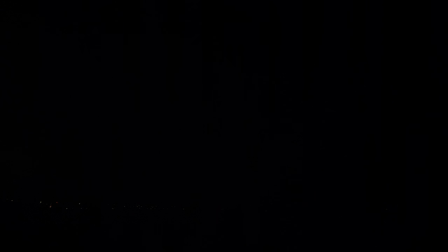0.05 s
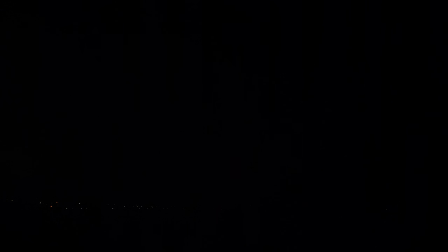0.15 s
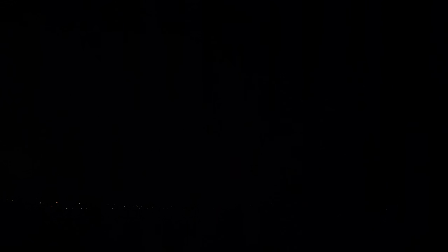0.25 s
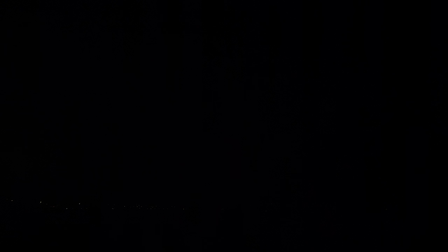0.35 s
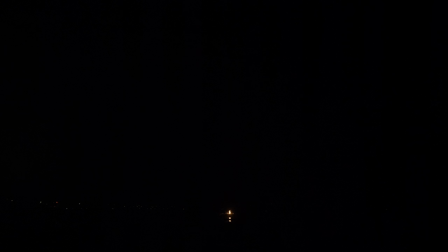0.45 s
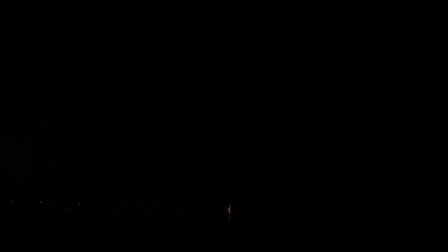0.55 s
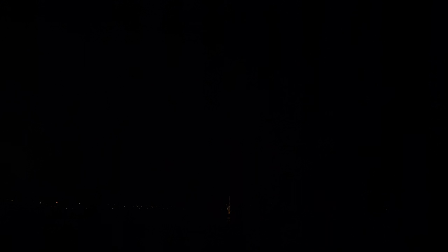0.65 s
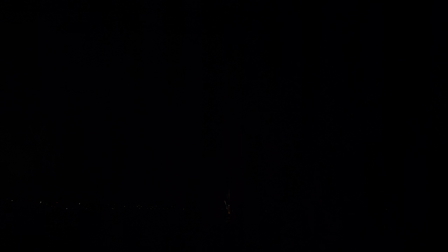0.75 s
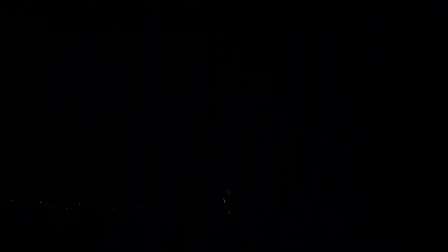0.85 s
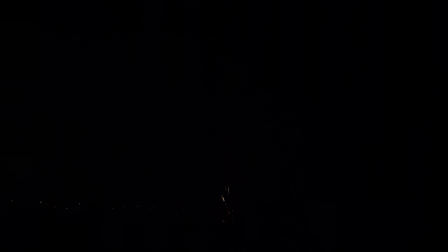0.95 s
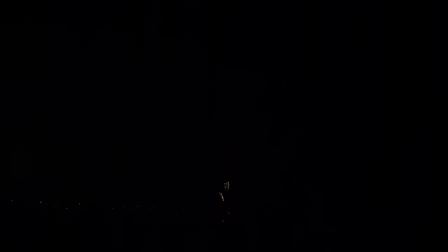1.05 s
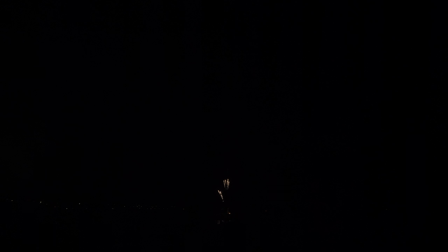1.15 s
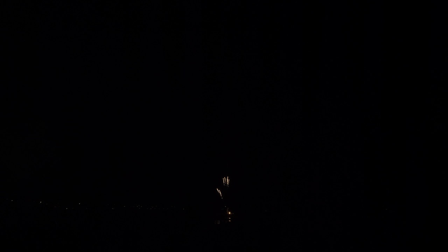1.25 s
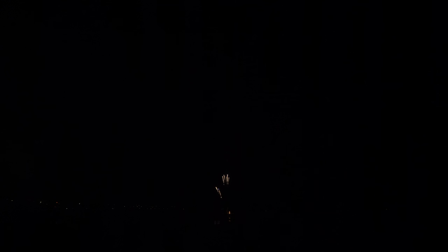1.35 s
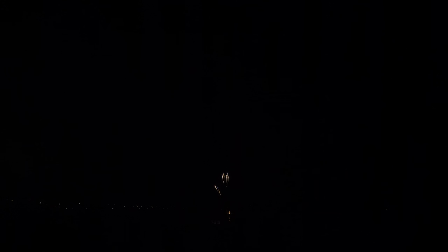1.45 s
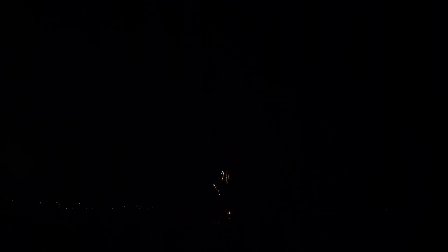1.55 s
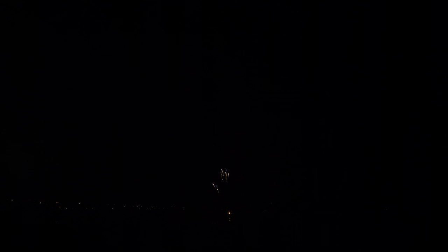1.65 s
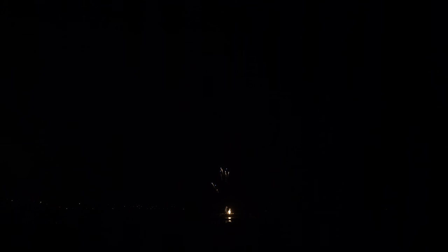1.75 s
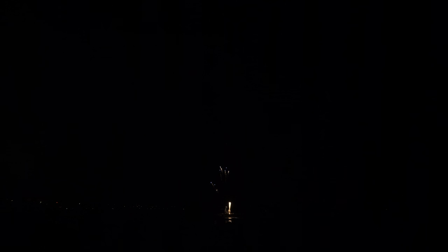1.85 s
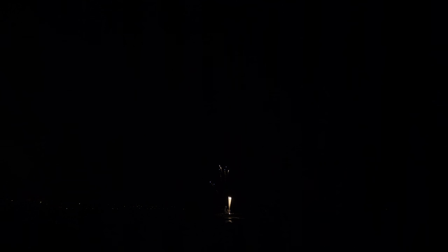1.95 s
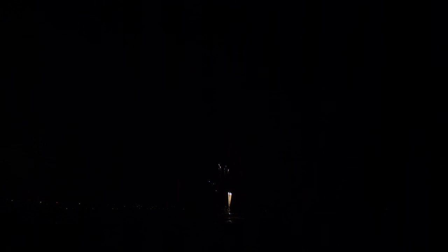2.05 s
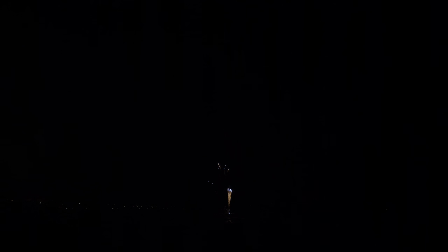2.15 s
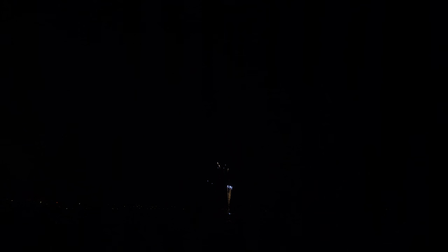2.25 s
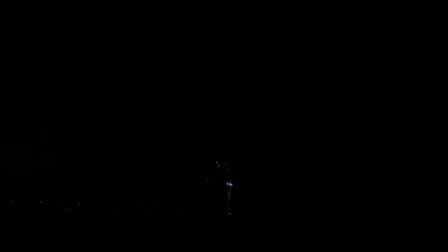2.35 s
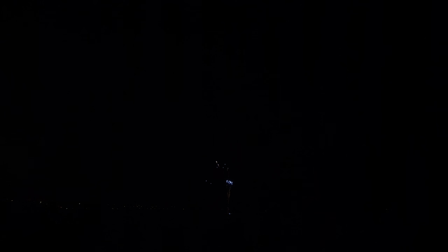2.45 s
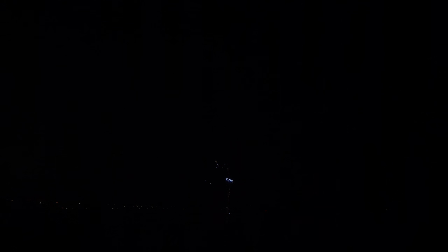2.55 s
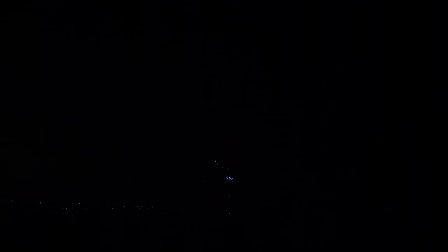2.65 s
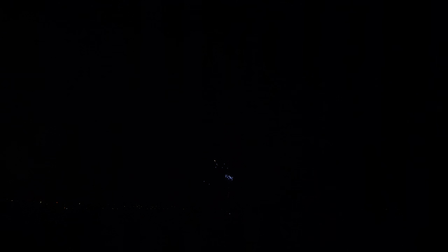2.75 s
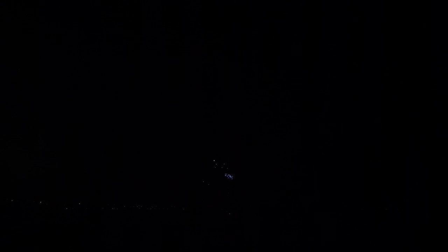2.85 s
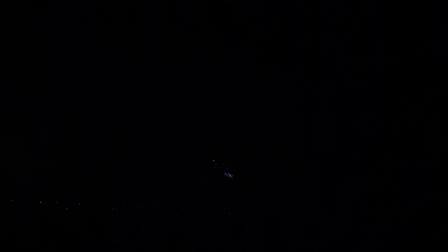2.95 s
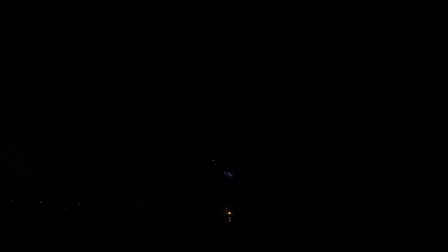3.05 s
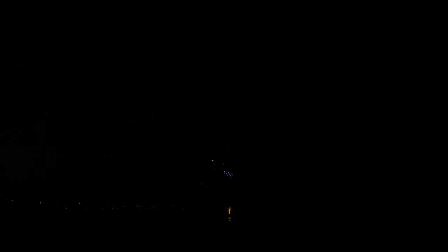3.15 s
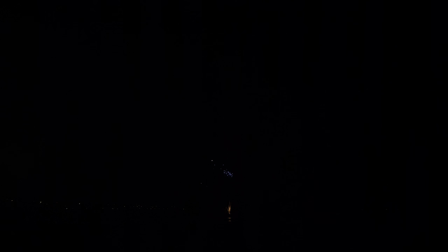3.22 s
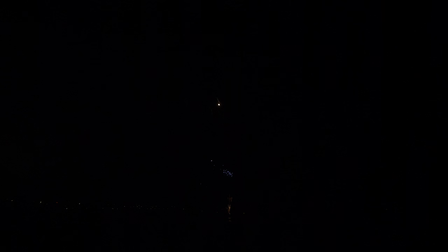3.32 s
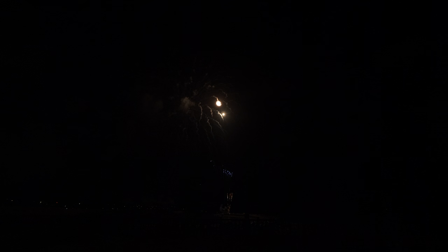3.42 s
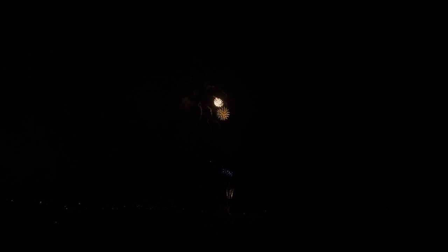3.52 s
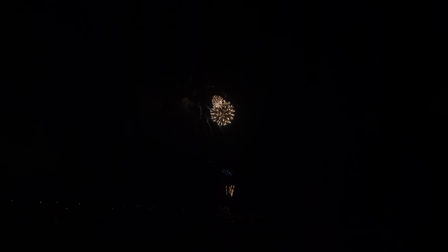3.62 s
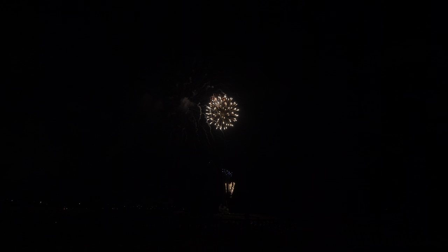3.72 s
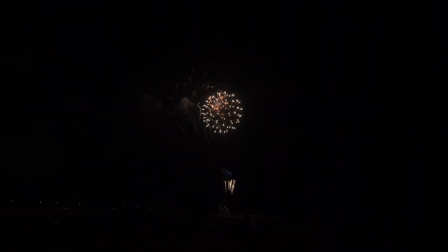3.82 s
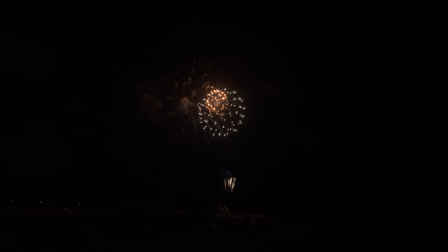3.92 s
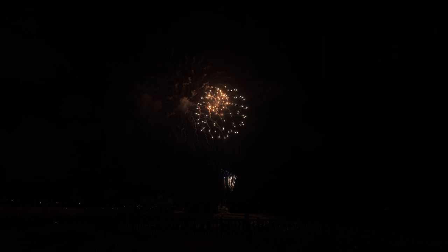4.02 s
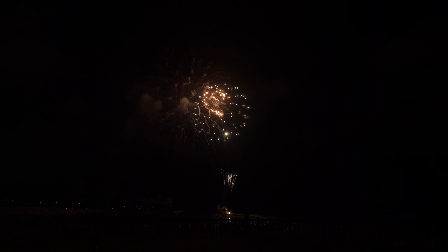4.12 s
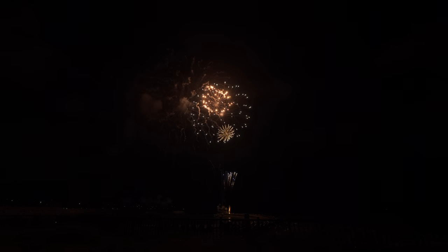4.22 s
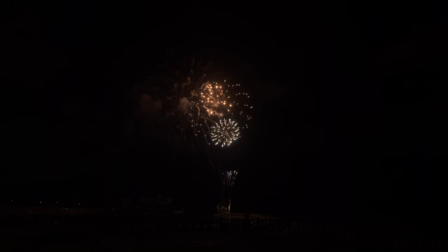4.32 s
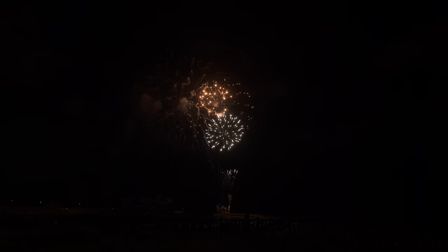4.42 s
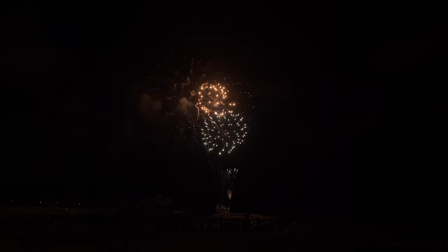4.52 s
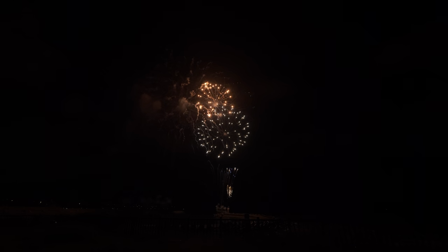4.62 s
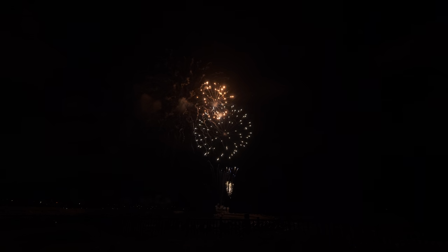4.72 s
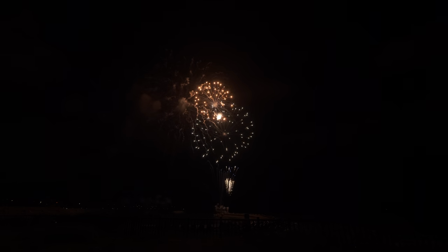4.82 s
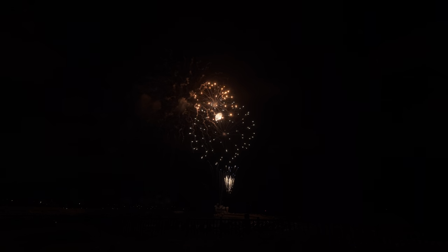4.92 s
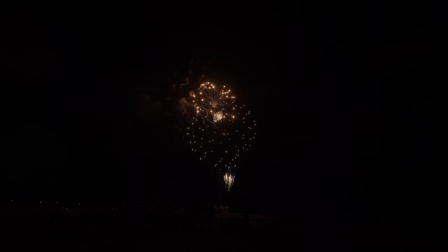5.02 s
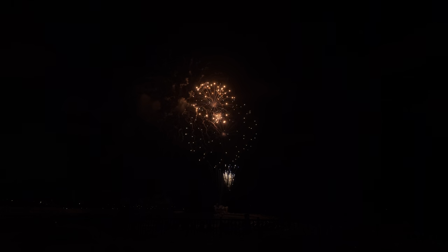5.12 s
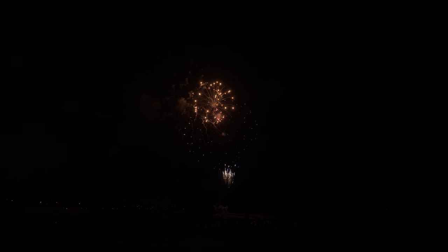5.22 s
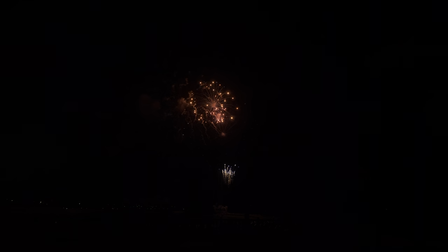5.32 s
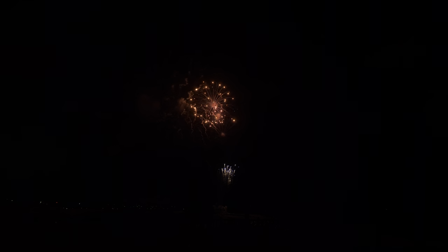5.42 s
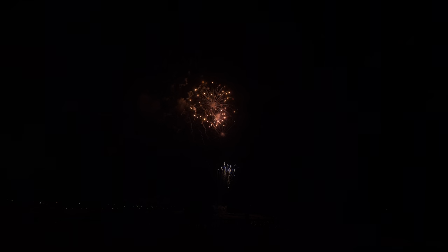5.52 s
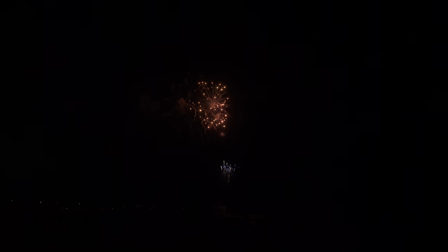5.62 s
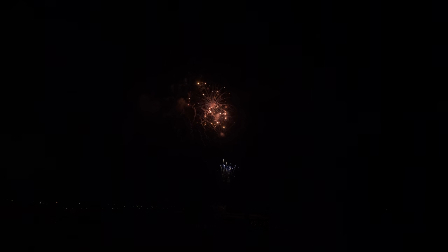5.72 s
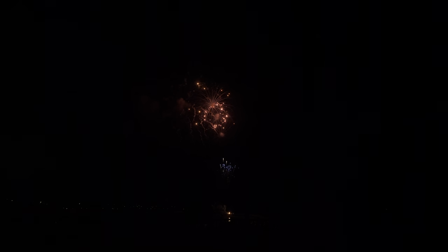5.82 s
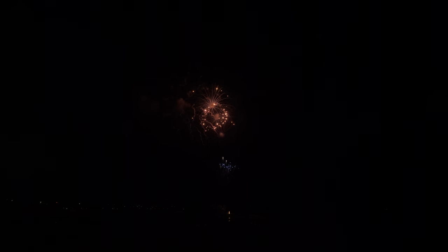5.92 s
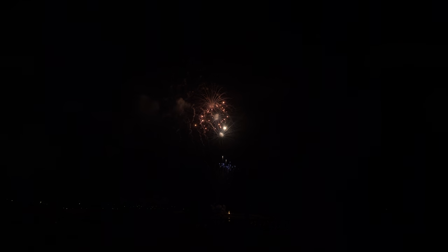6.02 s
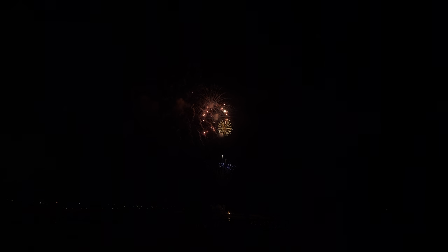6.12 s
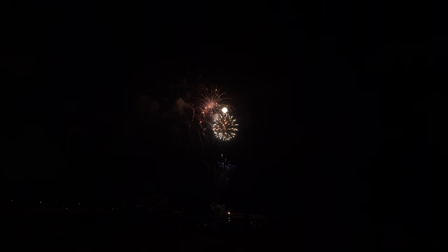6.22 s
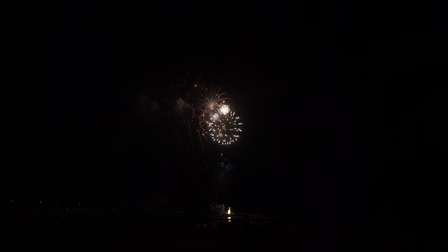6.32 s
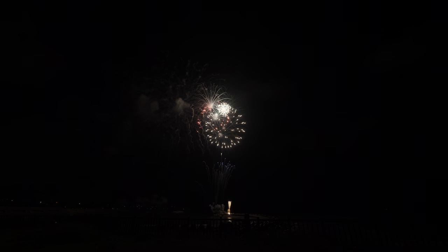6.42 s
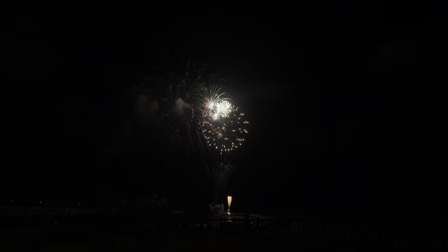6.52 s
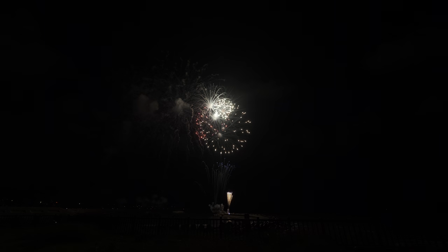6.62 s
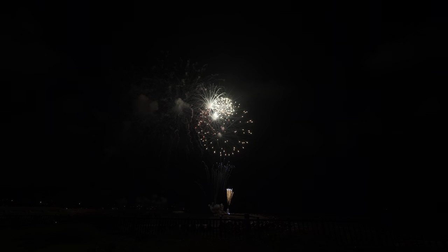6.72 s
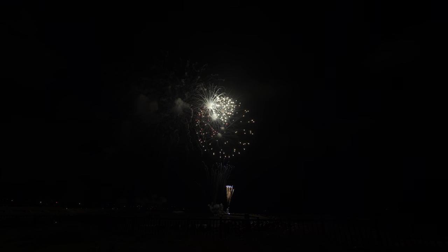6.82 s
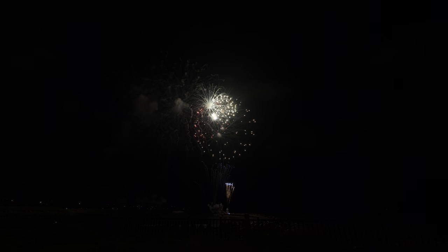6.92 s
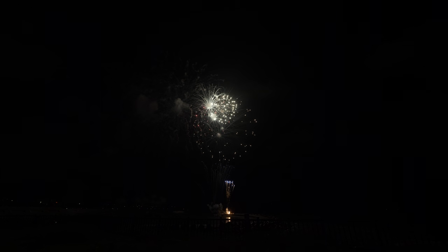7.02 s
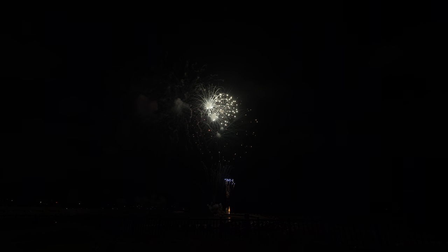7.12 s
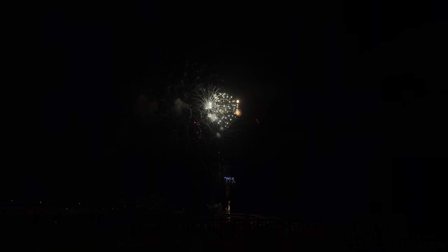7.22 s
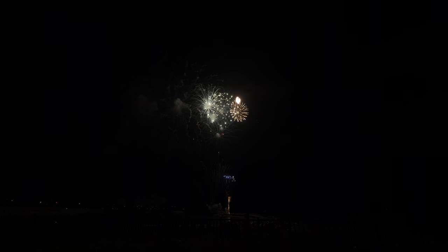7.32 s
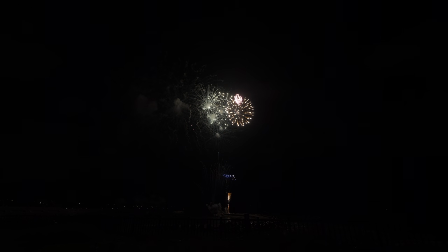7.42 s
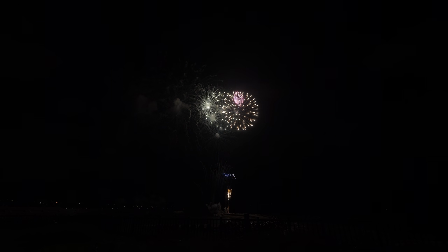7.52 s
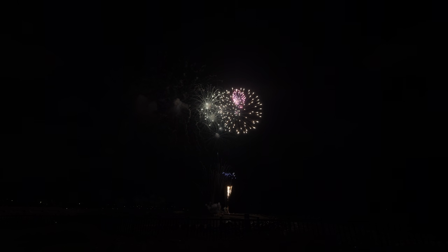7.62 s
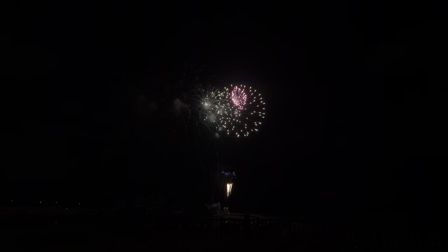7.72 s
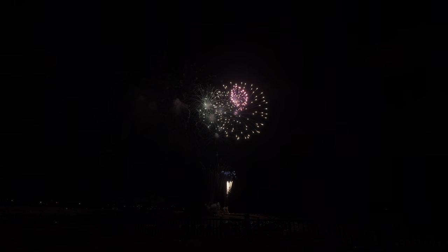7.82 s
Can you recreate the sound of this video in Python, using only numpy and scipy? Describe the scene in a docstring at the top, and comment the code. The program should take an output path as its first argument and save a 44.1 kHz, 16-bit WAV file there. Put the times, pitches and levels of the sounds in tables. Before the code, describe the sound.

On a dark shore, soft surf, chirping crickets and a thin bush-cricket buzz are broken by deep mortar thumps. Then aerial shells burst over the sea with hard, overloading cracks, dull distant thuds and a rumbling, crackling roll of echoes. A last sharp pair of bangs and another launch thump end it. The stereo microphones also catch tiny close ticks and slight hiss.

```python
"""Night fireworks over the sea, heard from the shore by a spaced microphone pair that overloads.
From the start surf washes, crickets chirp, a bush cricket buzzes and small ticks sound close by.
From 1.1 s mortars thump: a rounded blast, then a decaying low boom; dull far echoes follow.
From 4.1 to 6.9 s shells burst, each a shock with its ground echo and a scatter of clicks; a last mortar
fires at 7.7 s. Every bang sets off a roll of coast echoes, built from clumps of filtered random clicks."""
import sys
import numpy as np
from scipy import signal
from scipy.fft import rfft, irfft
from scipy.io import wavfile

SR = 44100
rng = np.random.default_rng(int(sys.argv[2]) if len(sys.argv) > 2 else 0)


def waveform_to_disk(signal):
    """Save audio, clipped to [-1, 1], as 16-bit WAV at the path in sys.argv[1]."""
    frames = np.transpose(np.atleast_2d(signal))
    scaled = np.clip(frames, -1, 1) * 32767
    samples = np.round(scaled).astype(np.int16)
    wavfile.write(sys.argv[1], SR, samples)


N = 346626

# shell bursts: [t/s, shock level/dB, overpressure/ms, ground echo delay/ms, ground echo level/dB, roll level/dB]
SHELL_BURSTS = [(4.0710, 9, 1.18, 4.52, 0, -29.5), (4.1950, 14, 1.85, 4.18, 1, -25),
                (4.875, 14, 1.7, 3.4, -5.5, -25), (5.4959, 4.5, 0.87, 4.06, -5, -34),
                (6.8088, 13.5, 1.74, 3.64, 0.5, -28), (6.8936, 3.5, 1.08, 4.36, -5, -27.5)]
# echoes from nearby walls and slopes: [delay/ms, level/dB]
WALL_ECHOES = [(12.2, -11), (15.5, -17), (21.3, -28), (25.2, -21), (29.5, -19.5), (35.5, -19), (48.5, -29),
               (66.5, -25.5), (97.5, -31), (103.5, -31.5)]
# rough front of a burst: [f/Hz, level/dB per Hz]
BURST_FRONT = [(200, -43), (500, -0.5), (1200, 1), (2500, -9.5), (5000, -13.5), (9000, -22.5),
               (14000, -26.5), (20000, -76)]


def bursts():
    """Shell bursts: shock, ground echo, dull near echoes and a short bright scatter."""
    out = np.zeros((2, N))
    for s, db, ms, ground_ms, ground_db, _ in SHELL_BURSTS:
        wave = gain_of(db) * shock(ms, damping=0.54)
        add(out, s, soft(wave, 0.032))
        add(out, s + ground_ms / 1e3, gain_of(ground_db) * soft(wave, 0.069))
        dull = soft(wave, 0.54)
        for late_ms, echo_db in WALL_ECHOES:
            add(out, s + late_ms / 1e3, gain_of(echo_db) * dull)
        add(out, s, crack(BURST_FRONT, 0.83 * db - 22.5, fast_t60=0.032, slow_db=-22.5, slow_t60=0.39))
    return out


# mortar shots: [t/s, blast level/dB, overpressure/ms, rise/ms, boom level/dB, rough front level/dB,
# boom pitch factor, fade-in noise level/dB, roll level/dB]
MORTAR_SHOTS = [(1.1087, 2, 2.07, 0.25, -5.5, -22, 1.1, -44, -38.5),
                (1.1120, -1, 1.27, 0.57, -43, -49, 0.85, -60, -50),
                (2.3854, 3.5, 3.9, 0.45, -7.5, -19.5, 1.09, -42, -39),
                (3.7426, 0.4, 3.3, 0.34, -7.5, -25.5, 0.99, -32.5, -36.5),
                (4.8096, 1.5, 3.3, 0.33, -6.5, -28.5, .99, -42, -28),
                (6.9339, -7, 1.3, 0.47, -13.5, -35, 1.01, -56, -46),
                (7.7006, 2, 3.4, 0.95, -9, -33, 1.09, -37, -38)]
# boom along the water: [f/Hz before the pitch factor, level/dB re boom level, t60/s]
BOOM_MODES = [(38.5, -4.5, 0.28), (65.3, 3, 0.049), (138.8, -12, 0.21)]
# rough front of a mortar: [f/Hz, level/dB per Hz]
MORTAR_FRONT = [(200, -23), (500, -2.5), (1000, 2.5), (2000, -17.5), (2800, -5), (4200, -7.5),
                (6000, -16.5), (9000, -16.5), (13000, -45), (20000, -44)]
# beach and barge answering a mortar: [f/Hz, level/dB per Hz]
BEACH_AND_BARGE = [(60, -28), (150, 4), (300, -4.5), (600, -18), (1000, -23.5), (1800, -34.5), (5000, -59)]


def mortars():
    """A rounded blast with a rough front, and a long suction that rings on as a boom."""
    out = np.zeros((2, N))
    t = np.arange(SR // 2) / SR
    fade_n = 500
    fade_in = np.hanning(2 * fade_n)[:fade_n]
    for s, db, ms, rise_ms, boom_db, crack_db, pitch, fade_db, _ in MORTAR_SHOTS:
        u = t * 1e3 / ms
        pulse = np.cos(np.pi / 2 * u) * np.exp(-(u / 1.4) ** 2)
        blast = gain_of(db) * soft(pulse, rise_ms / 2)
        boom = np.zeros(len(t))
        for hz, mode_db, t60 in BOOM_MODES:
            # negative: starts as suction
            boom -= gain_of(boom_db + mode_db - 60 * t / t60) * np.sin(2 * np.pi * hz * pitch * t)
        thump = blast + boom
        add(out, s, thump)
        add(out, s + 0.085, -gain_of(-13.0) * soft(thump, 1.34))  # a far bank returns it inverted
        add(out, s - 0.0008, crack(MORTAR_FRONT, crack_db, fast_t60=0.025, slow_db=-26.5, slow_t60=0.28))
        answer = crack(BEACH_AND_BARGE, boom_db - 18.5, fast_t60=0.13, slow_db=-16.5, slow_t60=0.52)
        add(out, s + 0.00409, answer)
        # a faint push and noise fade in over about 11 ms before the blast
        noise = crack(MORTAR_FRONT, fade_db, fast_t60=0.56, slow_db=-40, slow_t60=0.5)[:, :fade_n]
        add(out, s - fade_n / SR, fade_in * (gain_of(boom_db - 23.5) + noise))
    return out


# single far echoes: [t/s, peak level/dB before rounding, overpressure/ms, rough front level/dB]
FAR_THUDS = [(1.871, -22, 2.2, -62), (4.287, -10.5, 1.2, -48), (4.714, -10, 1.5, -35.5),
             (5.043, -15.5, 1.07, -35), (5.11, -23, 2.2, -32), (5.244, -13.5, 1.9, -33.5),
             (5.299, -11.5, 1.13, -46), (5.401, -11, 1.8, -36.5), (5.527, -31, 1, -31),
             (5.663, -9, 1.26, -37), (5.726, -34, 1.8, -42), (5.969, -21.5, 0.95, -51),
             (6.008, -22.5, 1.54, -43.5), (6.143, -24, 1.7, -49), (6.356, -6, 1.4, -34),
             (7.3, -18, 1.9, -52), (7.331, -9.5, 1.9, -38.5), (7.479, -25, 1.6, -38.5),
             (7.594, -20, 1.57, -46)]
# rough front of a far echo: [f/Hz, level/dB per Hz]
FAR_FRONT = [(250, -17), (500, 9), (1200, -6.5), (2500, -15.5), (5000, -26), (9000, -45), (20000, -78)]
THUD_ROUNDING = 0.36  # share of the overpressure time
THUD_REPEAT_S, THUD_REPEAT_DB = 0.02305, -6.5  # a slope repeats each thud


def thuds():
    """Far echoes have lost their edge in the air; a little of the rough front is left."""
    out = np.zeros((2, N))
    for s, db, ms, crack_db in FAR_THUDS:
        thud = gain_of(db) * soft(shock(ms, damping=0.3), THUD_ROUNDING * ms)
        add(out, s, thud)
        add(out, s + THUD_REPEAT_S, gain_of(THUD_REPEAT_DB) * soft(thud, 0.4))
        add(out, s, crack(FAR_FRONT, crack_db, fast_t60=0.067, slow_db=-47, slow_t60=0.46))
    return out


# spectra of the three roll bands, low to high: [f/Hz, level/dB per Hz]
RUMBLE_SPECTRUM = [(12, -32), (20, -8), (48, 4), (161, 3), (226, -1.5), (328, -8.5), (386, -17), (520, -40),
                   (700, -30.5), (910, -57), (1540, -120)]
RATTLE_SPECTRUM = [(260, -23.5), (450, 2), (527, -1), (663, -5), (717, -5), (1190, -7.5), (2500, -22.5),
                   (3250, -39), (5500, -120)]
SIZZLE_SPECTRUM = [(1350, -26), (2300, -3), (2870, -4), (3320, -1), (5970, -9.5), (7760, -16), (12000, -23),
                   (15600, -43), (22000, -120)]
# roll envelopes, rows rumble, rattle, sizzle: [delay/s, swell/s, decay/dB per s, level/dB re roll level]
BURST_ROLL_SHAPE = [(0.029, .06, 15.5, 1.3), (0.058, 0.049, 14, -14), (0.035, .04, 17, -26.5)]
MORTAR_ROLL_SHAPE = [(0.024, 0.056, 19.6, -1.5), (0.025, 0.049, 29, -18.5), (0.029, 0.033, 31.4, -28)]
THUD_ROLL_DB = -29  # re thud peak
# steady sea: [f/Hz, level/dB per Hz]
SEA_SPECTRUM = [(12, -45), (20, 5.5), (82, 0.5), (103, -4), (134, -3.5), (192, -15.5), (487, -19),
                (538, -27), (744, -25.5), (1050, -24.5), (2210, -32), (2500, -40), (3250, -60),
                (5500, -120)]
SEA_DB = -49.5
# surf rising and falling on the beach: [t/s, level/dB]
SURF_LEVEL = [(0.0, -64), (0.76, -60.5), (1.3, -57.5), (1.8, -59), (2.3, -73), (3.1, -68.5), (3.7, -74),
              (5.0, -67), (6.5, -56.5), (7.86, -64)]
SURF_LOW_DB, FIZZ_DB, FIZZ_FOLLOWS = -57, -69, 0.17  # steady low wash; mean fizz; its share of the surf's dB swing
ROLL_STEP = 64  # samples per envelope point


def roll():
    """Bangs set off countless small echoes in clumps, sparse in the bass, dense above; the sea washes under."""
    shells = [(row[0], row[-1]) for row in SHELL_BURSTS]
    low = [(row[0], row[-1]) for row in MORTAR_SHOTS]
    low += [(row[0], row[1] + THUD_ROLL_DB) for row in FAR_THUDS]
    t = np.arange(0, N + ROLL_STEP, ROLL_STEP) / SR
    surf_db = np.interp(t, *np.transpose(SURF_LEVEL))
    fizz_db = FIZZ_DB + FIZZ_FOLLOWS * (surf_db - surf_db.mean())
    under_db = (SURF_LOW_DB, surf_db, fizz_db)
    seeds = rng.exponential(1, N) ** 3 * (rng.random(N) < 110 / SR)
    clumps = evened(soft(seeds, 3.5) ** 0.35).clip(-2, 2)
    out = gain_of(SEA_DB) * evened(coloured(scattered(9000, 1.0), SEA_SPECTRUM))
    spectra = (RUMBLE_SPECTRUM, RATTLE_SPECTRUM, SIZZLE_SPECTRUM)
    clicks_per_s, clump_db = (500, 5000, 12000), (2.2, 2.9, 2.3)
    for k, points in enumerate(spectra):
        clicks = coloured(scattered(clicks_per_s[k], 1.9), points)
        echoes = evened(clicks * gain_of(clump_db[k] * clumps))
        power = rolling(shells, *BURST_ROLL_SHAPE[k]) + rolling(low, *MORTAR_ROLL_SHAPE[k])
        power = power + gain_of(under_db[k]) ** 2
        out += echoes * np.interp(np.arange(N) / SR, t, np.sqrt(power))
    return out


def rolling(starts, late, swell, dies_db, over_db):
    """Summed power of the rolls set off by bangs [t/s, level/dB]: each swells, then decays steadily in dB."""
    s, db = np.transpose(starts)[:, :, None]
    u = np.maximum(np.arange(0, N + ROLL_STEP, ROLL_STEP) / SR - s - late, 0)
    level = (1 - np.exp(-u / swell)) * gain_of(db + over_db - dies_db * u)
    return (level ** 2).sum(0)


# small ticks close by: [t/s, level/dB, ring f/Hz, knock level/dB]
CLOSE_TICKS = [(0.3596, -57, 4250, -65), (0.4454, -51.5, 4600, -63), (0.4913, -57, 5300, -64),
               (0.5524, -63, 10700, -56), (2.9094, -66, 7920, -64), (3.1494, -64, 7910, -56),
               (3.2694, -63, 7840, -62), (3.3608, -58, 5650, -71), (3.4196, -59, 5850, -54),
               (4.358, -53, 5940, -62), (5.203, -52.5, 6500, -63), (5.332, -52, 10600, -64),
               (5.719, -50.5, 10200, -62), (5.7494, -57, 10600, -62), (5.7994, -57, 5010, -58),
               (5.8386, -54, 6140, -65), (6.2223, -56.5, 4950, -71), (6.2444, -57.5, 5560, -70),
               (6.272, -56, 10600, -70), (6.542, -48.5, 9870, -76), (6.5999, -58, 5050, -68),
               (6.6314, -52, 5560, -69), (6.6817, -53.5, 9770, -66), (7.4654, -51, 7300, -68)]
CENTRED_DB, PAN_PER_DB = -69, -0.5  # the louder a tick, the nearer it is to the right microphone
TICK_OVERTONE, TICK_OVERTONE_DB = 1.22, -9  # frequency ratio and level re ring
SNAP_SPAN = 2  # snap band: this factor either side of the ring


def ticks():
    """A tiny crack of noise, a brief rough ring with an overtone and a duller knock."""
    out = np.zeros((2, N))
    t = np.arange(1200) / SR
    for s, db, hz, knock_db in CLOSE_TICKS:
        pan_db = PAN_PER_DB * (db - CENTRED_DB)
        noise, waver = rng.standard_normal((2, len(t)))
        band_hz = [hz / SNAP_SPAN, min(hz * SNAP_SPAN, SR / 2.2)]
        b, a = signal.butter(2, band_hz, "bandpass", fs=SR)
        snap = signal.lfilter(b, a, noise) * gain_of(-60 * t / 0.025)
        phase = 2 * np.pi * hz * t + 0.13 * np.cumsum(waver)
        ring = np.sin(phase) + gain_of(TICK_OVERTONE_DB) * np.sin(TICK_OVERTONE * phase)
        ring = ring * gain_of(-60 * t / 0.035)
        knock = gain_of(knock_db - 60 * t / 0.04) * np.sin(2 * np.pi * 2200 * t)
        tick = gain_of(db) * (0.95 * snap + 0.73 * ring) + knock
        add(out, s, gain_of([[pan_db / 2], [-pan_db / 2]]) * tick)
    return out


# cricket runs of falling whistles: [first t/s, last t/s, spacing/s, mean level/dB, mean start f/Hz, length/s]
CRICKET_RUNS = [(.305, .77, .0764, -66, 4120, .054), (.848, 1.03, .087, -65.5, 4200, .042),
                (.83, 1.07, .0485, -64.5, 3880, .04), (1.184, 1.7, .0425, -66, 3980, .027),
                (1.327, 1.67, .084, -65, 3800, .024), (5.88, 6.27, .0775, -63.5, 4050, .046),
                (6.408, 6.73, .053, -64, 3880, .028)]
CHIRP_FALL_HZ_PER_S = 14000
CHIRP_WOBBLE_S, CHIRP_WOBBLE_DB, CHIRP_WOBBLE_HZ = 0.004, 2, 70  # unevenness from chirp to chirp
CHIRP_ROUGH_TURNS = 0.005  # random phase step per sample


def crickets():
    """Falling whistles with soft ends, slightly uneven, off to one side; a far chorus chirps faintly at random."""
    out = np.zeros(N)
    chirps = [(s * N / SR, -80 + 5 * a, 3850 + 250 * b, 0.04) for s, a, b in rng.random((90, 3))]
    for first, last, spacing, db, hz, length in CRICKET_RUNS:
        times = np.arange(first, last, spacing)
        for s, (a, b, c) in zip(times, rng.uniform(-0.9, 1, (len(times), 3))):
            chirps.append((s + CHIRP_WOBBLE_S * a, db + CHIRP_WOBBLE_DB * b, hz + CHIRP_WOBBLE_HZ * c, length))
    for s, db, hz, length in chirps:
        t = np.arange(0, length, 1 / SR)
        rough = CHIRP_ROUGH_TURNS * np.cumsum(rng.standard_normal(len(t)))
        turns = hz * t - CHIRP_FALL_HZ_PER_S / 2 * t ** 2 + rough
        add(out, s, gain_of(db) * np.sin(2 * np.pi * turns) * signal.windows.tukey(len(t), 0.9))
    return np.array([np.roll(out, 2), out])


# bush cricket phrases: [start t/s, end t/s, level/dB once warm, wing stroke f/Hz]
BUZZ_PHRASES = [(-.5, 0.983, -72.5, 87), (1.24, 2.061, -74.5, 106), (2.44, 3.85, -73, 99.1),
                (5.054, 6.8, -72.5, 99.2)]
BUZZ_SWELL_S, BUZZ_START_DB, BUZZ_START_HZ = 0.32, -3, -250  # a phrase starts faint and flat, then warms up


def bush_cricket():
    """Each wing stroke is a short falling scrape near 8 kHz."""
    out = np.zeros(N)
    t = np.arange(N) / SR
    for start, end, db, rate in BUZZ_PHRASES:
        cold = np.exp(-np.maximum(t - start, 0) / BUZZ_SWELL_S)
        stroke = rate * t % 1
        turns = np.cumsum(8400 + BUZZ_START_HZ * cold - 1100 * stroke) / SR
        scrape = np.exp(-((stroke - 0.4) / 0.25) ** 2) * np.sin(2 * np.pi * turns)
        on = np.clip(np.minimum(t - start, end - t) / 0.012, 0, 1)
        out += on * gain_of(db + BUZZ_START_DB * cold) * evened(scrape)
    return np.array([out, np.roll(out, 4)])


def shock(ms, damping):
    """A pressure step that swings through a suction phase and settles."""
    u = np.arange(2000) / SR * 1e3 / ms
    return np.cos(np.pi / 2 * u ** 0.913) * np.exp(-damping * u)


def crack(points, db, fast_t60, slow_db, slow_t60):
    """Turbulence and nearby clutter break the front into a cluster of small clicks that thins out."""
    t = np.arange(SR // 2) / SR
    clicks = evened(coloured(scattered(7000, 4.1, n=len(t)), points))
    return clicks * (gain_of(db - 60 * t / fast_t60) + gain_of(db + slow_db - 60 * t / slow_t60))


PAIR_SAMPLES = 8  # travel from one microphone to the other


def scattered(per_s, spread_db, n=N):
    """Clicks of random sign and size from all sides: each reaches the left microphone a little early or late."""
    draw = rng.random((n, 4))
    hit = draw[:, 0] < per_s / SR
    size = hit * np.sign(draw[:, 1] - 0.5) * gain_of(-spread_db * np.log(draw[:, 2] + 0.0023))
    shift = np.round(PAIR_SAMPLES * (2 * draw[:, 3] - 1)).astype(int)
    left_at = np.clip(np.arange(n) + shift, 0, n - 1)
    return np.array([np.bincount(left_at, size, n), size])


def coloured(x, points):
    """Filters causally (minimum phase) to a spectrum of [f/Hz, level/dB] points."""
    f, db = np.transpose(points)
    grid_hz = abs(np.fft.fftfreq(16384, 1 / SR))
    log_gain = np.log(gain_of(np.interp(np.log(grid_hz + 1), np.log(f), db)))
    taps = np.fft.ifft(np.exp(np.conj(signal.hilbert(log_gain)))).real[:8192]
    return signal.oaconvolve(x, taps[None])[:, :x.shape[1]]


def soft(x, ms):
    """Rounds edges with two equal one-pole lowpasses of this time constant."""
    r = np.exp(-1e3 / (SR * max(ms, 0.001)))
    return signal.lfilter([(1 - r) ** 2], [1, -2 * r, r * r], x)


def gain_of(db):
    """Decibels to gain."""
    return 10 ** (np.asarray(db) / 20)


def evened(x):
    """Scales to rms 1."""
    return x / np.sqrt(np.mean(x ** 2) + 1e-20)


def add(mix, s, sound):
    """Adds a sound at a time in seconds, cut at the end of the mix."""
    part = mix[..., round(s * SR):][..., :sound.shape[-1]]
    part += sound[..., :part.shape[-1]]


def scene():
    """Sum of all sources."""
    return bursts() + mortars() + thuds() + roll() + ticks() + crickets() + bush_cricket()


# microphone balance: [f/Hz, left re right level/dB]
PAIR_BALANCE = [(100, -2.0), (1500, -2.1), (4000, -.7), (9000, -.3)]
# capsule hiss: [f/Hz, level/dB per Hz]
HISS_SPECTRUM = [(900, -16), (1500, 0), (2500, -18.5), (6000, -9.5), (10000, -7.5), (15600, -9.5),
                 (16200, -36)]
HISS_DB, EDGE_HZ = -69, 16450


def record(dry):
    """Left capsule weaker, most in the bass; capsule hiss, overload, a limiter that lags the shock, band limit."""
    f, db = np.transpose(PAIR_BALANCE)
    grid_hz = np.fft.rfftfreq(N, 1 / SR)
    tilt = gain_of(np.interp(np.log(grid_hz + 1), np.log(f), db) / 2)
    pair = irfft(rfft(dry) * [tilt, 1 / tilt], N)
    pair = pair + gain_of(HISS_DB) * evened(coloured(rng.standard_normal((2, N)), HISS_SPECTRUM))
    loaded = np.clip(pair, -1.15, 1.15)
    over = soft(np.maximum(abs(loaded).max(0) - 0.6, 0), 2.8)
    limited = np.clip(loaded * gain_of(-32 * over), -0.98, 0.98)
    lowpass = signal.firwin(511, EDGE_HZ, window=("kaiser", 9), fs=SR)
    return signal.oaconvolve(limited, lowpass[None], "same")


dry = scene()
out = record(dry)
waveform_to_disk(out)
```